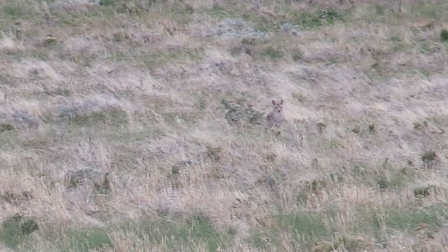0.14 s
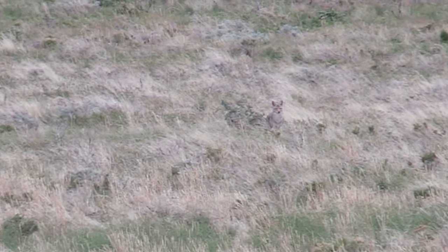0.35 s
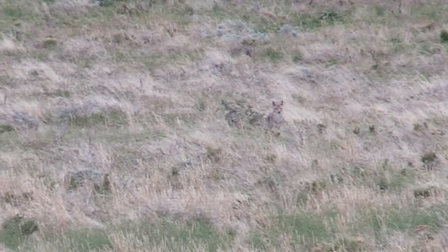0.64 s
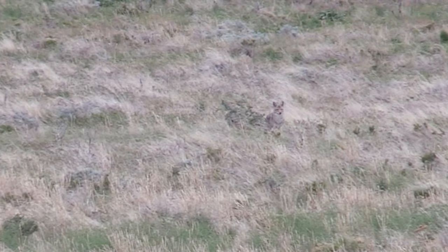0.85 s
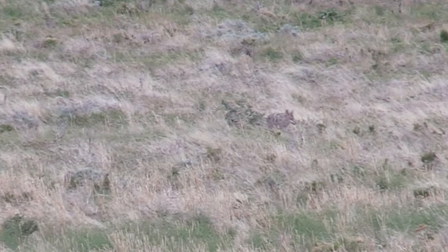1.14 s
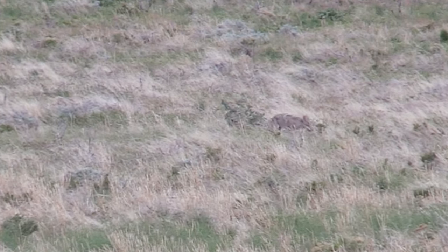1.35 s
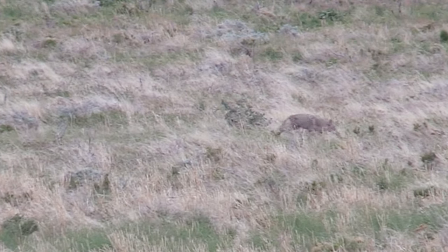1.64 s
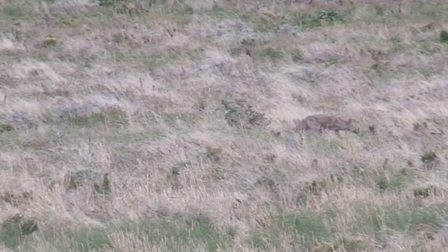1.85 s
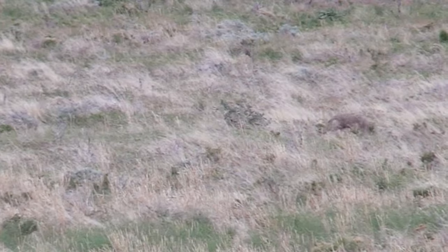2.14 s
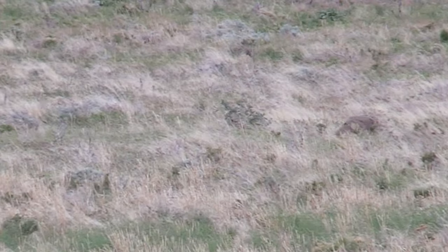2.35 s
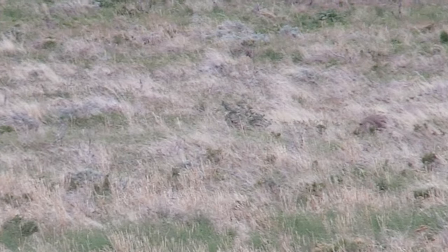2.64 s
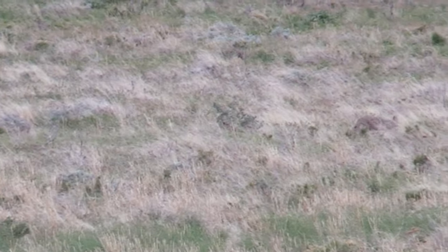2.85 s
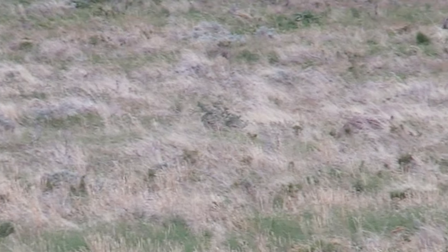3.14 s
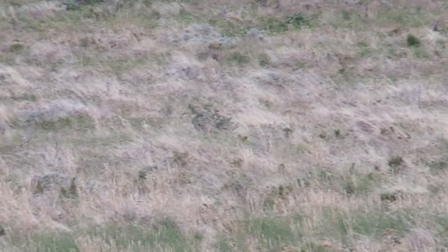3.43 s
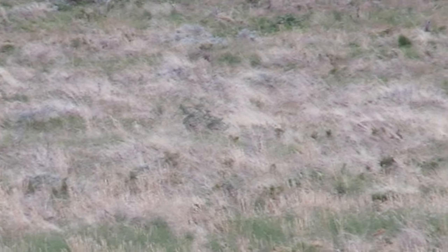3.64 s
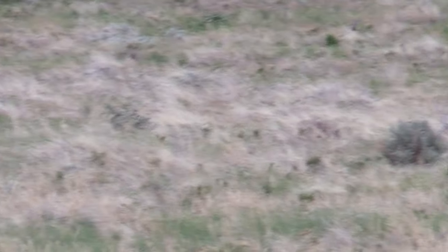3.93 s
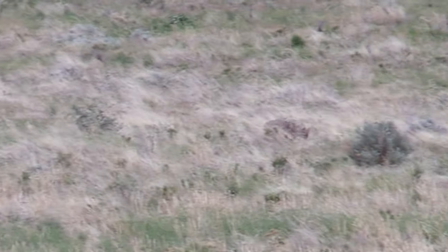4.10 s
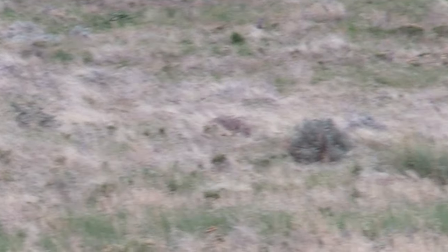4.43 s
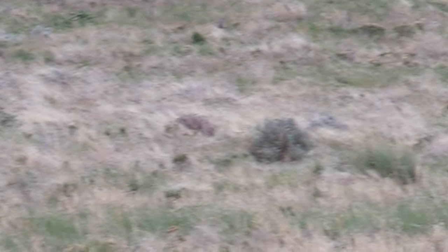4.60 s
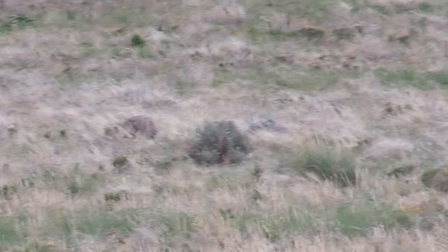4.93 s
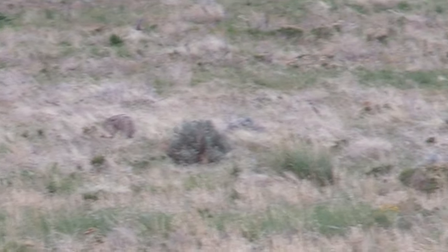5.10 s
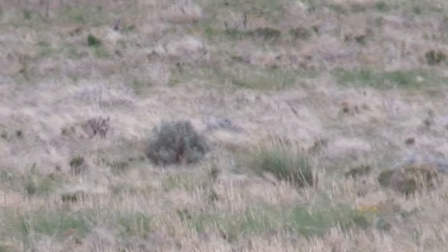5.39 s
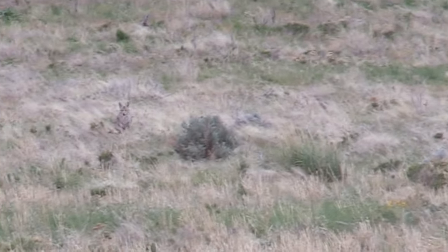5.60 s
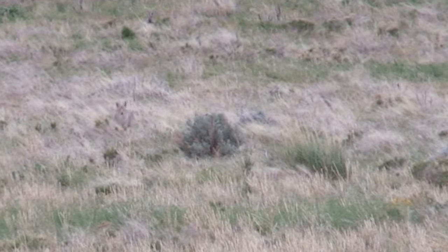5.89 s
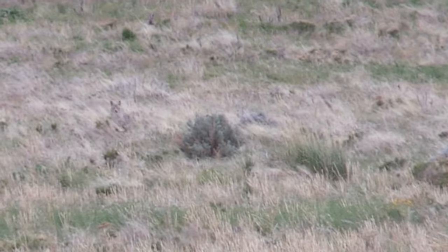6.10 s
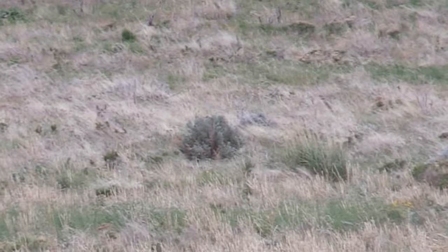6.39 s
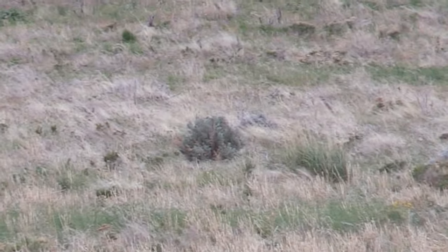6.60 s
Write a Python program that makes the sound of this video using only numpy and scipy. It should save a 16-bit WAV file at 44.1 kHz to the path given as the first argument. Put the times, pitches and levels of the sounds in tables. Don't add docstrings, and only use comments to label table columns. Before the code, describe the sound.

A coyote squeals rapid rising yips and short whistling howls across an open grassy hillside while gusty wind buffets the microphone ever harder.

```python
import sys
import numpy as np
from scipy import signal
from scipy.fft import rfft, irfft, next_fast_len
from scipy.io import wavfile
from scipy.ndimage import uniform_filter1d, minimum_filter1d

SR = 44100
rng = np.random.default_rng(int(sys.argv[2]) if len(sys.argv) > 2 else 0)


def bounce(signal):
    frames = np.transpose(np.atleast_2d(signal))
    limited = np.clip(frames, -1, 1)
    pcm = np.round(limited * 32767).astype(np.int16)
    wavfile.write(sys.argv[1], SR, pcm)


def level_to_linear(level):
    exponent = np.asarray(level, float) / 20
    return 10 ** exponent


N = 297653
T = np.arange(N) / SR

# t/s, f/Hz, level/dB
BARKS = [
    (1.562, 1530, -34.5),
    (1.926, 1980, -28),
    (2.313, 1706, -33),
    (2.674, 1834, -32),
    (3.066, 1584, -34),
]
PURE_DB, TORN_DB = -20, -26


def unit(x):
    return x / np.sqrt(np.mean(x ** 2))


def coloured(points, tilt=lambda hz: 1):
    size = next_fast_len(N, real=True)
    hz = np.fft.rfftfreq(size, 1 / SR) + 1
    f, db = np.transpose(points)
    gain = level_to_linear(np.interp(np.log(hz), np.log(f), db)) * tilt(hz)
    return unit(irfft(rfft(rng.standard_normal(N), size) * gain, size)[:N])


def band(x, lo_hz, hi_hz, order=2):
    return signal.sosfilt(signal.butter(order, [lo_hz, hi_hz], "band", fs=SR, output="sos"), x)


def walk(rate):
    k = int(SR / rate)
    steps = np.repeat(rng.standard_normal(N // k + 1), k)
    return unit(uniform_filter1d(uniform_filter1d(steps, k), k)[:N])


def bell(t, at, width):
    return np.exp(-((t - at) / width) ** 2)


def phrase(notes):
    join_s, attack_s, release_s, edge_db = .042, .007, .011, -25
    sag_db_per_s, break_db_per_octave = -28, -19
    calls, last = [], None
    for s, length, from_hz, to_hz, db, open_db in notes:
        octave_db = db + open_db
        if last and s - last[0] < join_s:
            dip_db = break_db_per_octave * abs(np.log2(from_hz / last[1]))
            middle = np.add(last, (s, from_hz, db, octave_db)) / 2 + [0, 0, dip_db, 0]
            middle_octave_db = max(middle[3], last[3]) if from_hz > last[1] else middle[3]
            calls[-1].append((*middle[:3], middle_octave_db))
        else:
            calls.append([(max(s - attack_s, 0), from_hz, db + edge_db, octave_db + edge_db)])
        end_db = db + sag_db_per_s * length
        last = (s + length, to_hz, end_db, end_db + open_db)
        calls[-1] += [(s, from_hz, db, octave_db), last]
    release = (release_s, 0, edge_db, edge_db)
    return [sorted(c) + [tuple(np.add(c[-1], release))] for c in calls]


def squeal(calls, tremble, flutter_db):
    # f/Hz, level/dB
    mouth = [(2200, 3.5), (2650, -1), (3100, -12.5), (3450, -6.5), (3750, -7), (4300, -5), (5000, -11),
             (5500, -9.5)]
    out, shake, crack = np.zeros(N), walk(160), walk(120)
    flutter = [level_to_linear(k * flutter_db * walk(150)) for k in (1, .9, 1.3)]
    for call in calls:
        s, *columns = np.transpose(call)
        span = slice(int(s[0] * SR), int(s[-1] * SR))
        hz, db, octave_db = (uniform_filter1d(np.interp(T[span], s, c), size=90) for c in columns)
        slide = uniform_filter1d(np.abs(np.gradient(np.log(hz))) * SR, size=300)
        slide = np.minimum(slide / 12, 1)
        phase = 2 * np.pi * np.cumsum(hz * (1 + tremble * (1 + slide) * shake[span])) / SR
        octave_db = octave_db + np.interp(2 * hz, *np.transpose(mouth)) - 3.1 * slide * np.abs(crack[span])
        octave_db = octave_db - 1.5 * np.maximum(-63 - octave_db, 0)
        third_db = octave_db - 3 - 12 * ((3 * hz - 4120) / 640) ** 4
        tone = sum(level_to_linear(level) * flutter[k][span] * np.sin((k + 1) * phase)
                   for k, level in enumerate((db, octave_db, third_db)))
        out[span] += np.sqrt(2) * tone * signal.windows.tukey(len(hz), .05)
    return out


def yips_and_howls():
    # t/s, length/s, from f/Hz, to
    # f/Hz, level/dB
    head_notes = [(.046, 0.0084, 2080, 2350, -42), (.15, 0.017, 2420, 2380, -53),
                  (.375, .013, 1706, 1720, -29.5), (.703, 0.0059, 2190, 2140, -40),
                  (.755, .03, 2480, 2680, -51), (.79, .018, 2680, 2690, -51.5),
                  (.826, .005, 2750, 2760, -56), (.985, .026, 1870, 2005, -31),
                  (1.281, 0.0039, 1697, 1400, -48), (1.772, .004, 2800, 2790, -37),
                  (3.73, 0.021, 2700, 2700, -49), (1.612, .016, 2610, 2510, -45),
                  (1.644, .006, 2680, 2680, -39), (1.762, .006, 2740, 2755, -33),
                  (2.006, 0.0089, 2690, 2710, -36.5), (2.035, 0.034, 2620, 2510, -33),
                  (2.15, .008, 2560, 2650, -39), (2.372, 0.025, 2275, 2770, -39),
                  (2.42, 0.0385, 2514, 2440, -34), (2.468, .014, 2670, 2760, -34.5),
                  (2.49, 0.035, 2890, 2880, -39.5), (2.729, .004, 2700, 2720, -43),
                  (2.745, .012, 2783, 2750, -41), (2.795, .012, 2800, 2790, -40),
                  (2.819, .003, 2753, 2755, -50), (2.83, 0.016, 2790, 2798, -44),
                  (2.861, .004, 2770, 2780, -55), (2.875, 0.019, 2850, 2885, -51),
                  (3.112, .008, 2700, 2690, -41), (3.138, .003, 2785, 2780, -47),
                  (3.156, 0.026, 2646, 2656, -35), (3.192, .06, 2717, 2806, -38),
                  (3.26, 0.057, 2810, 2801, -42), (3.562, 0.039, 2440, 2440, -38),
                  (3.612, 0.074, 2388, 2617, -35), (3.703, 0.0097, 2440, 2470, -40),
                  (.001, .006, 1660, 1630, -45),
        (0.626, 0.0021, 1806, 1600, -47),
        (1.16, .01, 2640, 2700, -47),
        (1.557, .002, 1900, 1750, -45),
        (2.166, .008, 2920, 2940, -43.5),
        (3.104, .003, 2250, 2350, -45),
        (3.545, .01, 2250, 2390, -39),
    ]
    # t/s, length/s, from f/Hz, to f/Hz, level/dB
    chest_notes = [(.013, .008, 1830, 1890, -37.5), (0.366, 0.0029, 1300, 1450, -43),
                   (.391, .009, 1780, 1866, -37), (0.633, 0.021, 1308, 1476, -36.5),
                   (0.669, .02, 1874, 1975, -35.5), (.958, .018, 1725, 1770, -44),
                   (1.033, 0.011, 2090, 2133, -37.5), (1.078, .014, 1883, 1820, -37.5),
                   (1.099, .004, 1890, 1885, -38), (1.112, 0.036, 1833, 1917, -38.5),
                   (1.294, 0.016, 1290, 1384, -45), (1.594, 0.0087, 1734, 1780, -39.5),
                   (2.7, .013, 1730, 1850, -37.5), (1.976, .018, 2310, 2470, -41),
                   (1.326, .02, 1487, 1500, -39), (1.939, 0.0085, 1600, 1695, -42),
                   (1.95, .011, 1720, 1850, -37.5), (2.068, .074, 2510, 2492, -36),
                   (2.318, .02, 1340, 1487, -39), (2.35, .011, 1700, 2120, -40),
                   (3.073, .024, 1623, 1760, -37), (3.474, .038, 1072, 1395, -41.5),
                   (3.527, .012, 1657, 1950, -42), (3.897, .008, 1150, 1200, -46),
                   (3.909, .021, 1250, 1428, -42), (1.404, .008, 1835, 2190, -44.5),
                   (3.098, .003, 1800, 2000, -44)]
    # t/s, length/s, from f/Hz, to f/Hz, level/dB
    half_open = [(1.15, .005, 1920, 2050, -43), (1.058, 0.011, 2056, 1987, -32),
                 (1.36, 0.0397, 1620, 1767, -34), (1.964, .008, 2000, 2220, -36),
                 (4.816, .016, 1610, 1780, -36), (5.35, .014, 1290, 1470, -42),
                 (5.378, .016, 1900, 2130, -36), (5.714, .015, 2100, 2400, -39),
                 (5.658, .021, 1320, 1460, -39.5), (1.57, 0.0202, 1590, 1710, -37),
                 (.024, .015, 1900, 1970, -32), (2.681, 0.0157, 1594, 1720, -35.5),
                 (3.937, 0.0059, 1650, 1950, -45), (4.213, .004, 2000, 2180, -47)]
    # t/s, length/s, from f/Hz, level/dB
    falls = [
        (.844, 0.0024, 2060, -44),
        (1.174, .012, 2620, -46),
        (1.422, 0.022, 2520, -48),
        (1.782, 0.0124, 2500, -41.5),
        (2.179, 0.017, 2740, -40),
        (2.534, 0.0125, 2600, -37),
        (2.903, 0.0163, 2720, -43.5),
        (3.323, 0.0089, 2250, -44.5),
        (4.219, .005, 2100, -47),
    ]
    # t/s, length/s, from f/Hz, to f/Hz, level/dB
    veiled = [
        (1.656, .052, 2673, 2707, -35),
        (1.71, .048, 2700, 2665, -33),
        (2.771, .018, 2677, 2667, -32.5),
        (4.033, .025, 2200, 2370, -35.5),
    ]
    # t/s, length/s, from f/Hz, to f/Hz, level/dB
    cracked = [
        (4.371, .011, 1377, 1696, -55),
        (4.805, 0.0096, 1402, 1556, -56),
        (4.834, .004, 1840, 2150, -54),
        (5.368, .004, 1650, 1750, -53),
        (5.4, .016, 2370, 2410, -53),
        (5.682, .011, 1620, 1756, -43.5),
        (1.604, 0.0064, 1850, 2150, -42.5),
        (2.716, .01, 2000, 2350, -52),
    ]
    # t/s, length/s, from f/Hz, to f/Hz, level/dB
    warble = [
        (3.947, .011, 2290, 2400, -36),
        (3.964, .016, 2590, 2607, -35.5),
        (3.988, .02, 2417, 2390, -48),
        (4.02, .006, 2360, 2330, -46),
        (4.063, .066, 2400, 2560, -33.5),
        (4.134, .006, 2690, 2700, -47),
        (4.147, .002, 2700, 2700, -58),
        (4.154, .009, 2710, 2620, -40),
        (4.17, 0.039, 2430, 2596, -36),
    ]
    # t/s, length/s, from f/Hz, to f/Hz, level/dB
    torn_notes = [(4.388, .01, 1960, 2055, -35), (4.403, 0.037, 2700, 2640, -49),
                  (4.449, .005, 2420, 2414, -39), (4.469, 0.0044, 2295, 2305, -48),
                  (4.483, 0.022, 2410, 2510, -37), (4.52, 0.072, 2534, 2566, -44),
                  (4.63, 0.033, 2640, 2600, -56), (4.842, .016, 2230, 2220, -50),
                  (4.863, .02, 2130, 1990, -47), (4.893, .02, 1900, 2080, -49),
                  (4.993, .016, 1860, 1960, -46), (5.02, 0.016, 2037, 2030, -36),
                  (5.126, 0.011, 1950, 1925, -49), (5.147, 0.012, 2010, 2340, -36.5),
                  (5.164, 0.017, 2700, 2670, -46), (5.646, 0.0077, 1447, 1347, -50),
                  (5.424, .003, 2450, 2400, -52), (5.432, .009, 2230, 2200, -44),
                  (5.448, .026, 2500, 2545, -46), (5.48, 0.019, 2570, 2630, -41),
                  (5.512, .002, 2610, 2600, -64), (5.527, .016, 2610, 2610, -55),
                  (5.689, .009, 1880, 1950, -37), (5.703, .004, 1950, 1900, -48),
                  (5.737, .012, 2450, 2500, -62), (5.765, .025, 2450, 2580, -50),
                  (5.8, .022, 2650, 2700, -54), (5.977, .005, 1350, 1290, -48),
                  (5.988, 0.0063, 1293, 1360, -42), (6.022, 0.016, 1813, 1813, -40),
                  (6.045, 0.011, 1680, 1620, -56)]
    bark_s, rest_hz, torn_from_s = .003, 2036, 4.3
    pure = head_notes + warble
    pure += [(s, bark_s, hz, hz, db) for s, hz, db in BARKS]
    pure += [(s, length, hz, rest_hz, db) for s, length, hz, db in falls]
    registers = [(cracked, 8.5), (chest_notes, 0), (half_open, -11), (veiled, -17), (pure, PURE_DB),
                 (torn_notes, TORN_DB)]
    calls = phrase(sorted(n + (open_db,) for notes, open_db in registers for n in notes))
    clear = [c for c in calls if c[0][0] < torn_from_s]
    torn = [c for c in calls if c[0][0] >= torn_from_s]
    return squeal(clear, .006, flutter_db=2.3) + squeal(torn, .009, flutter_db=3.2)


def faint_strands():
    # t/s, length/s, from f/Hz, to f/Hz, level/dB
    faint_notes = [(4.356, 0.0093, 1800, 1720, -47), (4.85, 0.063, 2500, 2480, -48.5),
                   (4.95, .006, 1430, 1440, -50), (5.063, 0.017, 2040, 2040, -48),
                   (5.052, .04, 2340, 2350, -55), (5.54, .03, 3550, 2300, -55),
                   (5.197, .006, 2000, 2100, -53), (4.836, .006, 4280, 4400, -51),
                   (4.972, .016, 1270, 1500, -51), (4.981, .007, 4300, 4380, -47),
                   (5.152, .011, 2050, 2100, -47), (5.341, .004, 1500, 1400, -52),
                   (5.359, .007, 4330, 4500, -52), (5.37, .016, 3480, 3560, -52),
                   (5.378, .022, 3950, 4220, -55), (1.604, .007, 1780, 1800, -45),
                   (2.714, .006, 1850, 1860, -44), (1.785, .035, 2680, 2750, -51),
                   (4.215, .03, 2550, 2580, -52), (3.097, .007, 1760, 1780, -45),
                   (1.962, .012, 1850, 1920, -46), (3.318, .014, 2800, 2790, -48),
                   (2.2, .03, 2600, 2660, -53), (3.053, .007, 1720, 1660, -49), (4.802, .03, 2750, 3650, -56),
                   (5.655, .02, 2520, 2850, -53), (4.025, .008, 3400, 3450, -56),
                   (.538, 0.018, 2700, 2700, -50), (.574, .005, 2700, 2680, -50), (.5, .018, 1280, 1300, -57),
                   (5.58, .025, 2320, 2280, -55.5), (6.11, .075, 1360, 1460, -55),
                   (4.861, .007, 4420, 4300, -52), (5.694, .006, 2200, 2400, -47),
                   (5.703, .011, 2400, 2100, -42), (.064, .004, 1880, 1880, -51),
                   (.078, .018, 1900, 2200, -55), (1.155, .02, 1800, 1880, -54), (5.7, .012, 3500, 3600, -58),
                   (6.2, .03, 1500, 1410, -59)]
    return squeal([phrase([n + (TORN_DB,)])[0] for n in faint_notes], .011, flutter_db=2.6)


def breath():
    air = rng.standard_normal(N) * level_to_linear(2.5 * walk(40))
    return unit(band(air, 1100, 3800) + .8 * band(air, 2500, 2900))


def pant():
    # t/s, level/dB
    pant_curve = [
        (.41, -70),
        (.45, -55),
        (.57, -50),
        (.66, -54),
        (.74, -62),
        (.78, -75),
    ]
    s, db = np.transpose(pant_curve)
    return level_to_linear(np.interp(T, s, db, -120, -120)) * breath()


def onset_puffs():
    puff_db, puff_s = -13, .004
    level = sum(level_to_linear(db + puff_db) * (T > s - puff_s) * np.exp(-np.abs(T - s + puff_s) / puff_s)
                for s, _, db in BARKS)
    return level * breath()


def distant_whistle():
    # t/s, length/s, from f/Hz, to f/Hz, level/dB
    thin_notes = [
        (5.776, .11, 3120, 3090, -60.5),
        (5.915, .072, 3075, 3050, -59),
    ]
    return squeal(phrase([n + (TORN_DB,) for n in thin_notes]), .002, flutter_db=2)


def hillside(x):
    blur_db, blur_s = -41.5, .029
    echo_db, echo_s, echo_width_s = -59.5, .14, .043
    t = np.arange(int(.4 * SR)) / SR
    shape = level_to_linear(blur_db) * np.exp(-t / blur_s) + level_to_linear(echo_db) * bell(t, echo_s, echo_width_s)
    return np.array([signal.fftconvolve(x, shape * rng.standard_normal(len(t)))[:N] for _ in range(2)])


def gusts():
    # t/s, rumble level/dB, left minus right level/dB, flutter above rumble level/dB
    breeze = [(0, -22.5, -7.5, -12.5), (.46, -26, -2, -17), (.77, -28.5, -6, -17.5), (1.05, -25, -7.5, -13),
              (1.3, -23, -0.5, -19.5), (1.9, -29.5, -2.5, -15.5), (2.15, -23, 0, -8), (2.5, -23, 0, -23.5),
              (2.84, -28, -4, -11.5), (3.15, -24, -6.5, -20.5), (3.76, -29, -4, -17),
              (4.15, -22, -0.5, -21), (4.62, -23, -11, -11.5), (5.05, -16, 2.5, -15), (5.5, -14.5, -3, -13),
              (6.1, -15.5, -4.5, -15), (6.45, -20, -1, -15.5), (6.75, -23.5, -12, -10.5)]
    # t/s, half width/s, left level/dB, right level/dB
    buffets = [(.0, 0.093, -44, -18.5), (.65, 0.1, -29, -25), (1.59, 0.094, -32, -20.5),
               (2.005, 0.01, -25, -10), (2.045, 0.033, -14.5, -4.5), (2.312, 0.047, -13, -10),
               (2.59, 0.028, -22, -13), (2.97, 0.041, -22, -18), (3.6, 0.096, -24, -22.5),
               (4.02, 0.091, -24, -22), (4.3, 0.047, -14, -13), (4.47, 0.049, -12.5, -17),
               (4.73, 0.056, -11.5, -18), (4.79, 0.02, -3.5, -3), (4.88, 0.044, -5.5, 0),
               (5.191, 0.061, -1.5, -6.5), (5.3, 0.082, -10.5, -11.5), (5.41, 0.044, -10, -10),
               (5.59, 0.022, -10, -13), (5.73, 0.029, -12, -3), (5.8, 0.034, -14, -9),
               (5.88, 0.061, -8, -4), (6.01, 0.043, -5.5, -19), (6.07, 0.014, -19, -8),
               (6.25, 0.14, -30, -20), (6.52, 0.021, -16, -16)]
    # t/s, half width/s, level/dB
    lulls = [
        (.49, .03, -5),
        (1.87, .045, -9),
        (2.73, .04, -5),
        (6.7, .04, -4),
    ]
    # t/s, half width/s, level/dB
    flurries = [(.04, .06, 3), (1.13, 0.085, 4.5), (2.01, 0.048, 5.5), (2.56, 0.04, 6), (3.65, 0.095, -6),
                (4.92, 0.042, 6.5), (.96, .05, 5), (.84, .045, -4), (2.25, .03, -4), (2.75, .03, -4),
                (5.23, 0.064, 3), (5.9, .08, 2.5), (4.4, .1, 2.5), (5.15, 0.054, 3.5), (5.74, 0.016, 6),
                (6.07, 0.031, 3.5)]
    flutter_lag = 0.53
    s, *columns = np.transpose(breeze)
    t = np.arange(0, N / SR, 1 / 500)
    breeze_db, pan_db, flutter_db = (np.interp(t, s, c) for c in columns)
    power = level_to_linear(breeze_db + np.array([pan_db, -pan_db]) / 2) ** 2
    power = power + sum(level_to_linear(np.array(db))[:, None] ** 2 * bell(t, at, width) for at, width, *db in buffets)
    left_db, right_db = 10 * np.log10(power) + sum(db * bell(t, at, width) for at, width, db in lulls)
    flutter_db = flutter_db + sum(db * bell(t, at, width) for at, width, db in flurries)
    flutter_db = flutter_db - flutter_lag * ((left_db + right_db) / 2 - breeze_db)
    return (np.interp(T, t, db) for db in (left_db, right_db, flutter_db))


def eddies(tilt):
    # f/Hz, level/dB per Hz
    rumble = [(7, -46), (14, 3), (32, -4), (72, -7.5), (216, -27), (340, -42.5), (700, -56), (1400, -78)]
    x = coloured(rumble, tilt)
    power = uniform_filter1d(uniform_filter1d(x ** 2, size=3000), size=3000)
    return unit(x / power ** 0.27)


def wind():
    left_db, right_db, flutter_db = gusts()
    low = [eddies(lambda hz: 1 / (1 + (hz / 115) ** 6)) for _ in range(2)]
    high = [eddies(lambda hz: 1 / (1 + (115 / hz) ** 6)) * level_to_linear(2.3 * walk(40)) for _ in range(2)]
    low[1] = unit(low[1] + 0.63 * np.roll(low[0], 220))
    high = [unit(h * (0.55 + uniform_filter1d(x ** 2, size=500))) for h, x in zip(high, low)]
    rumble_level = level_to_linear(1.48 * walk(14) + np.array([left_db, right_db]))
    follow_db = np.array([0.86 * left_db + 0.45 * right_db, 0.46 * left_db + 0.65 * right_db])
    flutter_level = level_to_linear(flutter_db + np.array([[-1.5], [1.5]]) + follow_db)
    return np.array(low) * rumble_level + np.array(high) * flutter_level


def motor():
    # f/Hz, level/dB
    hum_partials = [
        (372, -64),
        (565, -70.5),
        (628, -68.5),
    ]
    turns = np.cumsum(1 + 0.00583 * walk(6)) / SR
    return sum(level_to_linear(db + 2.5 + 3.05 * walk(8.2)) * np.sin(2 * np.pi * hz * turns) for hz, db in hum_partials)


def preamp_hiss():
    # t/s, depth level/dB, hold/s
    ducks = [(2.01, -3, 0.022), (4.775, -2, 0.035), (4.855, -3.5, 0.045), (5.175, -2.5, 0.02),
             (5.195, -8, 0.06), (5.255, -4.5, 0.036), (5.297, -6, 0.024), (5.327, -6, 0.02),
             (5.738, -6.5, 0.1), (5.851, -2.5, 0.084), (5.984, -5, 0.039)]
    # f/Hz, level/dB per Hz
    hiss_spectrum = [(90, -44), (150, -17.5), (280, -8.5), (500, -15), (1200, -18), (4000, -22),
                     (9730, -24.5), (15500, -27)]
    duck_db = uniform_filter1d(sum(db * ((T > s) & (T < s + hold)) for s, db, hold in ducks), size=300)
    mid, side = coloured(hiss_spectrum), 0.5 * coloured(hiss_spectrum)
    return level_to_linear(-48.5 + 0.38 * walk(11) + duck_db) * np.array([mid + side, mid - side])


def pressure_heaves():
    # t/s, half width/s, f/Hz, level/dB
    heaves = [
        (.835, .035, 26, -17),
        (.975, .028, 28, -17),
        (4.9, .04, 45, -10),
    ]
    heave = sum(level_to_linear(db) * bell(T, at, width) * np.sin(2 * np.pi * hz * (T - at)) for at, width, hz, db in heaves)
    return np.array([[.8], [1]]) * heave


def port_whistles():
    # t/s, length/s, f/Hz, level/dB
    cavity_rings = [
        (2.115, .04, 270, -29),
        (2.85, .03, 250, -44),
        (5.735, .003, 400, -27),
        (5.736, .003, 640, -35),
    ]
    air = rng.standard_normal(N)
    ring = np.zeros(N)
    for at, length, hz, db in cavity_rings:
        flat_swell = np.exp(-(((T - at) / length) ** 2) ** 2)
        ring += level_to_linear(db) * flat_swell * unit(band(air, 0.8 * hz, 1.0 * hz))
    return np.array([[1], [.4]]) * ring


def slaps():
    # t/s, peak level/dB, left minus right level/dB
    air_slaps = [(2.358, -42, -0.5), (4.52, -43, -0.5), (4.66, -43, 1.0), (4.759, -35, -1.0),
                 (4.838, -41, -1.5), (4.895, -37, -5.5), (5.071, -34, -4.5), (5.164, -35, -6.0),
                 (5.255, -33, -5.5), (5.289, -34, 4.5), (5.402, -33, -8.0), (5.587, -38, 1.5),
                 (5.732, -29.5, 3.0), (5.877, -36, -5.0), (5.961, -37, -5.0), (6.054, -38, -7.0),
                 (6.107, -40, -2.5), (6.163, -42, -6.5)]
    rise_s, decay_s, trim_db = .003, .011, -8.5
    air = band(rng.standard_normal((2, N)), 180, 590)
    t, size = T[:4000] - .01, np.zeros((2, N))
    shape = np.exp(-np.abs(t) / np.where(t < 0, rise_s, decay_s))
    for s, db, pan_db in air_slaps:
        at = int((s - .006) * SR)
        size[:, at:at + len(t)] += level_to_linear(db + trim_db + np.array([[pan_db / 2], [-pan_db / 2]])) * shape
    return size * unit(np.array([air[0], .6 * air[0] + 0.89 * air[1]]))


def plastic_tick():
    tick_s, tick_db = 5.0435, -22
    tick = np.zeros(N)
    tick[int(tick_s * SR)] = 1
    tick = band(tick, 350, 3000, order=3)
    return level_to_linear(tick_db) * tick / tick.max()


def scene():
    voice = yips_and_howls() + faint_strands() + pant() + onset_puffs() + distant_whistle()
    animals = voice * level_to_linear(np.array([[-1.5], [1.5]])) + hillside(voice)
    air = wind() + pressure_heaves() + port_whistles() + slaps()
    return animals + air + motor() + plastic_tick()


def roll_off(x):
    return signal.sosfilt(signal.butter(12, 15760, fs=SR, output="sos"), x)


def record(dry):
    limit = minimum_filter1d(np.minimum(1, .96 / np.abs(dry + 1e-9).max(axis=0)), size=800)
    limit = uniform_filter1d(uniform_filter1d(limit, size=400), size=400)
    return roll_off(preamp_hiss() + dry * limit)


dry = scene()
out = record(dry)
bounce(out)
```